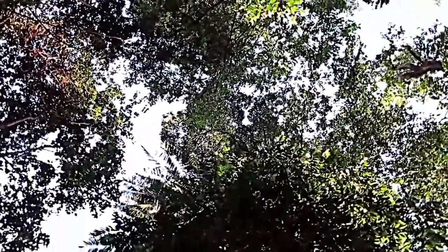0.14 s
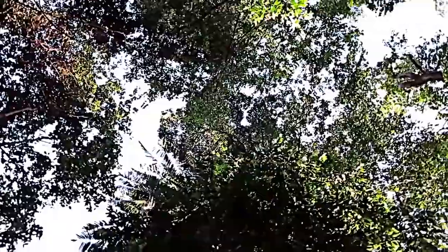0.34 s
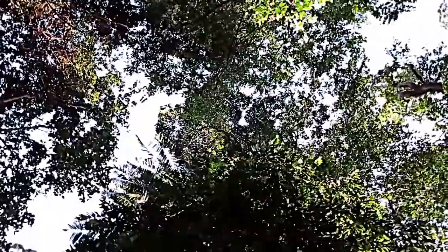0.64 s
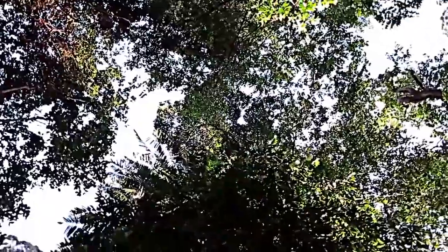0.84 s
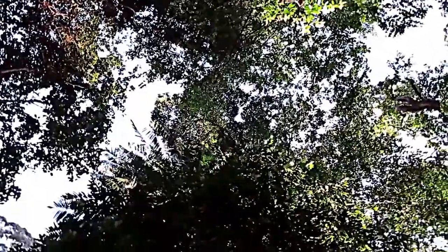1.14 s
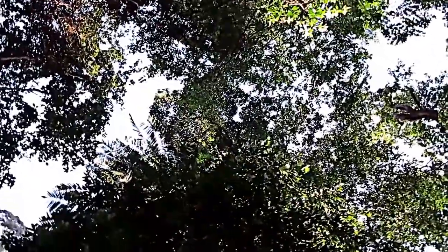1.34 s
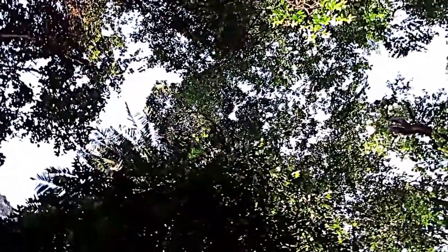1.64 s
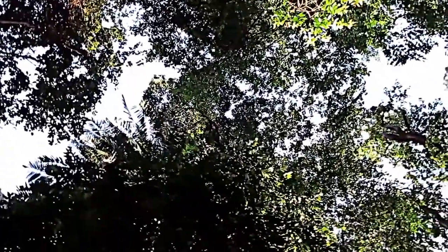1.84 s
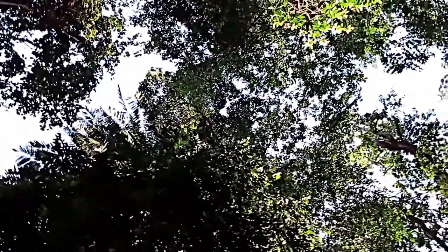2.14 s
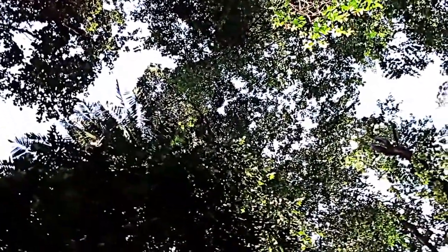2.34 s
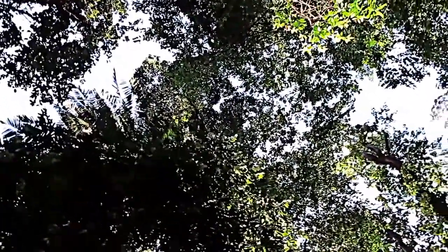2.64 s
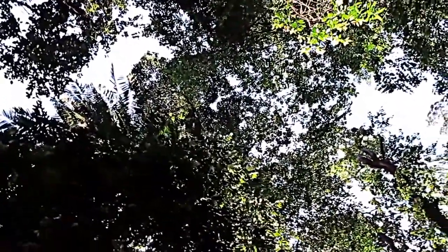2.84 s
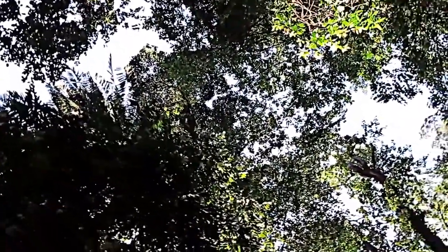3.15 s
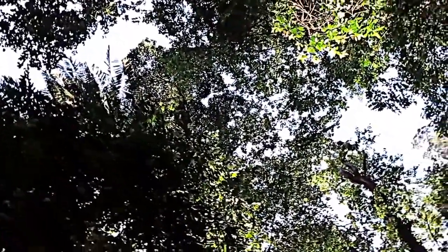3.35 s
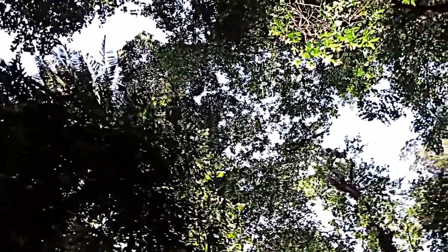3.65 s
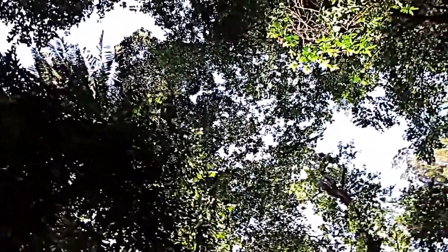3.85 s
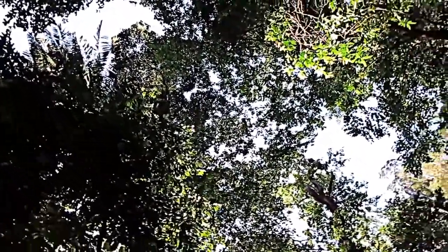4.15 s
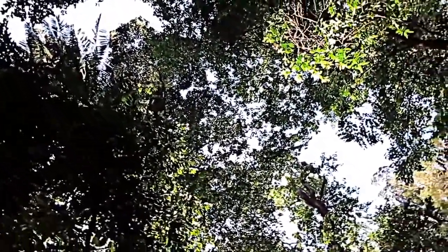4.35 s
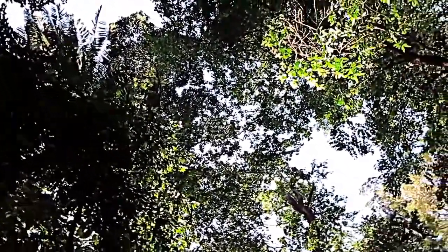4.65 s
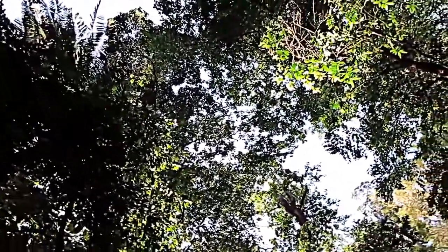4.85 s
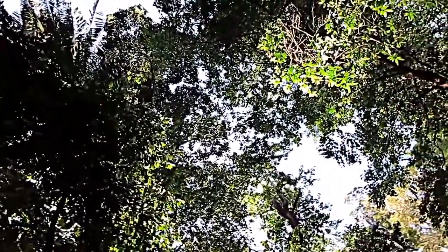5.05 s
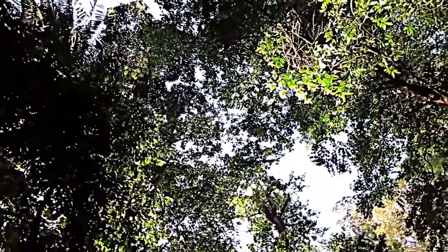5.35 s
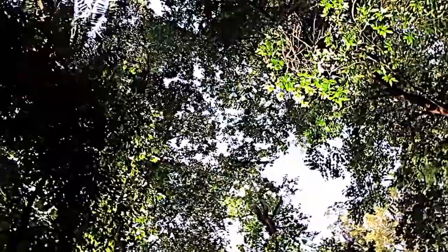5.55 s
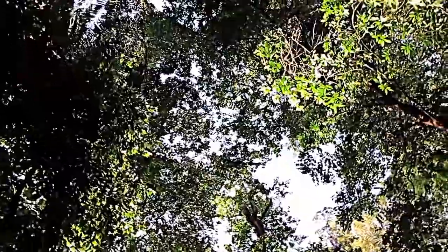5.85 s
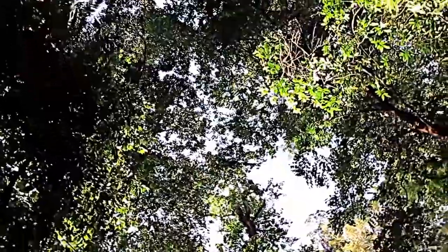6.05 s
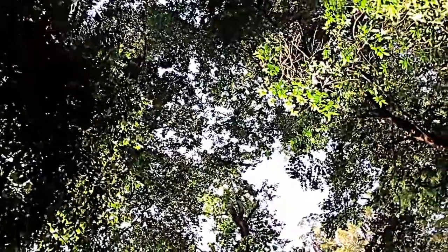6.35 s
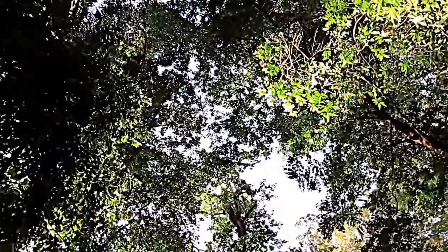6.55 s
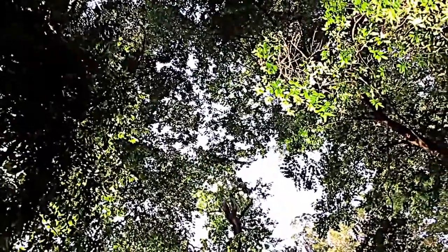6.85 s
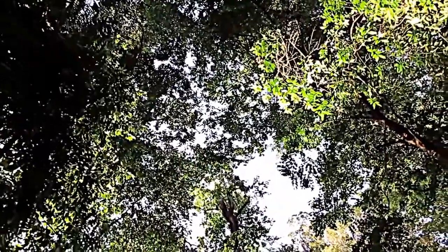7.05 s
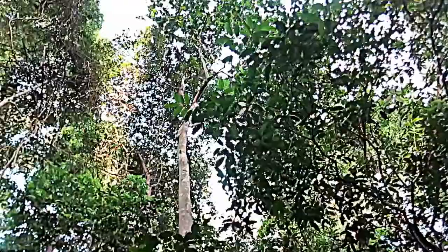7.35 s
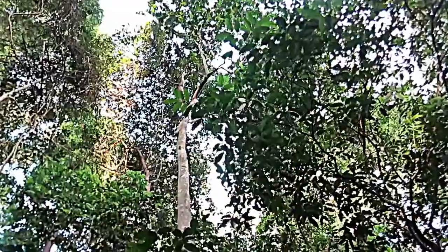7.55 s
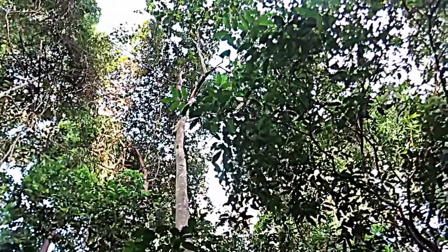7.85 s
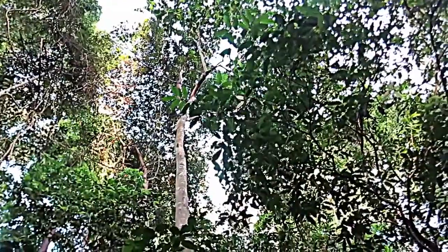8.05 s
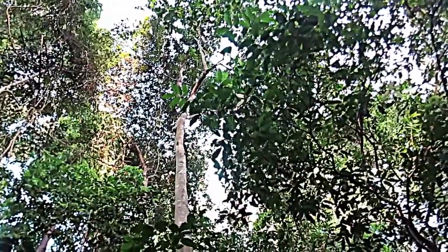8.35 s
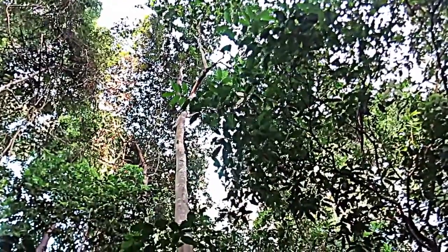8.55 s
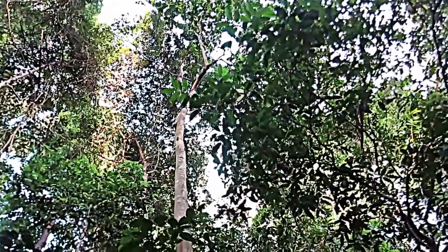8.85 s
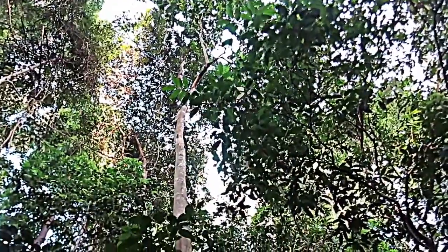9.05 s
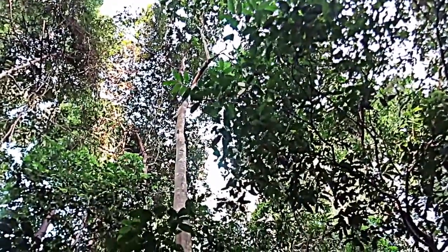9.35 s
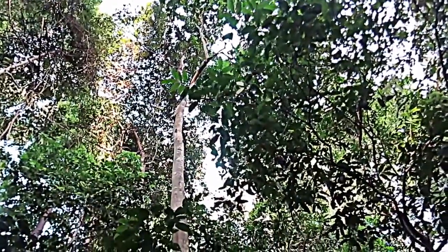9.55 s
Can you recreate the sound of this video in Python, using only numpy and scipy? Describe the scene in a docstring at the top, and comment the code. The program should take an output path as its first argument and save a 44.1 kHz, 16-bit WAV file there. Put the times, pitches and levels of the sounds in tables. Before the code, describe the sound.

A loud cicada rasps, throbs and squawks, then holds a shrill whine that slows to a rattle, over faint forest rumble.

```python
"""A cicada sings overhead, over forest rumble and a far chorus. Its voice is two clicking tymbals,
coloured by its body and thrown back by the trees. It opens with a dry rasp, a run of throbs (a twig-like
tick among them) and a squawk, then holds a long sinking whine that breaks into a rattle as a bird chirps.
At 7.3 s the sound cuts out briefly and resumes at another spot: rasp, throbs and squawk again while
a neighbour whines, then the start of a fresh whine."""
import sys
import numpy as np
from scipy import signal
from scipy.fft import rfft, irfft
from scipy.io import wavfile
from scipy.ndimage import uniform_filter1d, map_coordinates

SR = 44100
rng = np.random.default_rng(int(sys.argv[2]) if len(sys.argv) > 2 else 0)


def inscribe(sig):
    """Save sig as 16-bit PCM at rate SR to the path in sys.argv[1].

    A 1-D sig is mono; a 2-D sig holds one channel per row.
    Samples are clipped to [-1, 1] before scaling.
    """
    pcm = np.round(np.clip(np.atleast_2d(sig).T, -1, 1) * 32767)
    wavfile.write(sys.argv[1], SR, pcm.astype(np.int16))


N = 427769
TIME = np.arange(N) / SR
CUT_S, RESUME_S = 7.322, 7.416

# body EQ of a fresh whine: freq_hz, gain_db
FRESH_EQ = [(2400, -50.5), (3450, -20.5), (3950, -1.5), (4650, 0), (5150, -3.5), (5500, -28), (5850, -19),
            (8200, -15), (9400, -17.5), (10100, -42), (14000, -62)]
# body EQ of the sizzle on top of throbs and squawks: freq_hz, gain_db
SIZZLE_EQ = [(6000, -13), (8400, 18.5), (10000, 2.5), (11500, 4), (12600, 3), (14000, -19)]


def gain_of(db):
    return 10 ** (np.asarray(db) / 20)


def unit_rms(x):
    return x / np.sqrt(np.mean(x ** 2) + 1e-20)


def at_freq(curve, hz):
    freqs, values = np.transpose(curve)
    return np.interp(np.log(hz + 1), np.log(freqs + 1), values)


def at_time(curve, t):
    return np.interp(t, *np.transpose(curve))


def span(start_s, end_s):
    return np.arange(round(start_s * SR), round(end_s * SR)) / SR


def fade(t, seconds):
    return np.clip(np.minimum(t - t[0], t[-1] - t) / seconds, 0, 1)


def bump(t, middle_s, half_s):
    return np.exp(-((t - middle_s) / half_s) ** 2)


def add(mix, start_s, sound):
    part = mix[..., max(round(start_s * SR), 0):][..., :sound.shape[-1]]
    part += sound[..., :part.shape[-1]]


def band_rms(x, low_hz, high_hz):
    hz = np.fft.rfftfreq(len(x), 1 / SR)
    return np.sqrt(2 * np.sum(abs(rfft(x)[(hz > low_hz) & (hz < high_hz)]) ** 2)) / len(x)


def levelled(pair, size=4001):
    """Rides a stereo pair to unit level from moment to moment."""
    window = np.hanning(size)
    power = signal.fftconvolve(pair.mean(0) ** 2, window, "same")
    weight = signal.fftconvolve(np.ones(len(power)), window, "same")
    return pair / np.sqrt(power / weight + 1e-12)


def colour(x, eq, rings=(), size=8192):
    """A minimum-phase EQ with optional sharp peaks: every click rings on."""
    hz = np.fft.rfftfreq(size, 1 / SR)
    db = np.maximum(at_freq(eq, hz), -80)
    db = db + sum(height / (1 + (2 * (hz - centre) / width) ** 2) for centre, width, height in rings)
    log_gain = np.log(gain_of(np.r_[db, db[-2:0:-1]]))
    impulse = np.fft.ifft(np.exp(np.conj(signal.hilbert(log_gain)))).real[:size // 2]
    return signal.fftconvolve(x, impulse)[:len(x)]


def forest(x, t, wet_db, left_db, spacing=20):
    """Direct sound in stereo, plus scattered echoes from trunks and leaves."""
    # reverb time of the trees: freq_hz, t60_s
    decay = [(2000, 0.83), (5000, 1), (12000, 0.07)]
    # the microphone turns under the insect: time_s, left_lead_samples
    lead = [(0, 2.2), (3.1, 2), (3.9, 1.1), (6, 0)]
    slots = np.arange(2 * spacing, SR // 2, spacing)
    arrivals = slots + rng.integers(0, spacing, (2, len(slots)))
    taps = np.zeros((2, SR // 2 + spacing))
    np.put_along_axis(taps, arrivals, rng.choice([-1., 1.], arrivals.shape), 1)
    hz, age, spectra = signal.stft(taps, SR, nperseg=256)
    near_leaves = 1 + 3.8 * np.exp(-age / 0.0049)
    tail = signal.istft(spectra * near_leaves * gain_of(-60 * age / at_freq(decay, hz)[:, None]), SR)[1]
    echoes = signal.fftconvolve(x[None], tail / np.linalg.norm(tail[0]), axes=1)[:, :len(x)]
    left = map_coordinates(x, [np.arange(len(x)) + at_time(lead, t)], order=5)
    return (np.array([left, x]) + gain_of(wet_db) * echoes) * gain_of([[left_db / 2], [-left_db / 2]])


def wash(eq, patchy_db, size=1024):
    """A distant stereo bed of noise, drifting in patches."""
    # how alike left and right are: freq_hz, correlation
    likeness = [(60, 0.99), (250, 0.87), (600, 0.56), (1500, 0.85), (4000, 1), (12000, 0.13)]
    frames, hz = 4 * N // size + 5, np.fft.rfftfreq(size, 1 / SR)
    noise = rng.standard_normal((5, len(hz), frames))
    left, unrelated = noise[0] + 1j * noise[1], noise[2] + 1j * noise[3]
    patches = unit_rms(uniform_filter1d(uniform_filter1d(noise[4], size=12, axis=0), size=16, axis=1))
    alike = at_freq(likeness, hz)[:, None]
    spectra = np.array([left, alike * left + np.sqrt(1 - alike ** 2) * unrelated])
    spectra *= gain_of(at_freq(eq, hz)[:, None] + patchy_db * patches)
    return unit_rms(signal.istft(spectra, nperseg=size, noverlap=size - size // 4)[1][:, :N])


def fuzzy_tone(pitch_hz, width_hz):
    """Noise in one narrow band."""
    hz = np.fft.rfftfreq(N, 1 / SR)
    return unit_rms(irfft(rfft(rng.standard_normal(N)) / (1 + (2 * (hz - pitch_hz) / width_hz) ** 4), N))


def background():
    """Low rumble with a faint hum, far cicadas, and a lower call that comes and goes."""
    # spectra of the forest rumble and the far chorus: freq_hz, gain_db
    rumble_eq = [(20, -36), (59, -6), (90, -1), (141, -5.5), (224, -5.5), (913, -19), (1350, -27),
                 (2500, -30.5), (5000, -64)]
    chorus_eq = [(2400, -28.5), (3100, -10), (3800, 0), (4600, 6), (5500, -9), (7300, -2), (9000, -6.5),
                 (10500, -26), (12500, -22.5), (14000, -81)]
    # fader ride of the chorus: time_s, level_db
    chorus_ride = [(0, -34), (1.7, -31.5), (3.4, -35.5), (7.3, -28.5), (8.6, -34.5), (9.7, -40)]
    # swells of the lower call: middle_s, level_db
    call_swells = [(0.15, -58), (2.65, -56.5), (5.05, -58.5), (6.9, -66), (8.4, -60.5)]
    rumble = wash(rumble_eq, patchy_db=1.5, size=2048) * gain_of(np.where(TIME > RESUME_S, -40.5, -41.5))
    chorus = wash(chorus_eq, patchy_db=2.5) * gain_of(at_time(chorus_ride, TIME))
    swells = sum(gain_of(db) * bump(TIME, middle_s, half_s=0.75) for middle_s, db in call_swells)
    call = swells * fuzzy_tone(1594, width_hz=156)
    hum = gain_of(-52) * fuzzy_tone(113, width_hz=13.5)
    return rumble + chorus + call + hum


def bird(from_hz=1680):
    """Short, wavering whistles far off among the trees, each growing louder as it sweeps up."""
    # chirps, each peaking a little above its target: start_s, target_hz, level_db
    chirps = [(2.333, 2470, -57), (2.847, 2450, -58.5), (3.03, 2550, -56), (3.149, 2840, -49.5),
              (3.295, 2900, -51.5), (3.745, 3050, -50.5), (3.87, 2950, -56), (4.041, 2550, -56),
              (4.487, 2900, -55), (4.819, 2690, -53.5), (4.979, 2890, -52.5), (5.113, 2870, -49),
              (5.679, 2100, -58.5), (5.805, 2660, -52), (5.933, 2700, -55)]
    song = np.zeros(N)
    for start_s, target_hz, level_db in chirps:
        t = span(0, .055 * rng.uniform(.85, 1.15))
        sweep = 1.08 * np.sin(np.pi / 2 * (t / t[-1]) ** 1.3)
        waver = unit_rms(uniform_filter1d(rng.standard_normal(len(t)), size=60))
        hz = (from_hz + (target_hz - from_hz) * sweep) * (1 + 0.028 * waver)
        envelope = gain_of(level_db + 2.5) * (hz / target_hz) ** 1.7 * signal.windows.tukey(len(t), .5)
        add(song, start_s, envelope * np.sin(2 * np.pi * np.cumsum(hz) / SR))
    return forest(song, TIME, wet_db=9.5, left_db=-0.5)


def tick():
    """One small dry tick close by, like a twig."""
    track, t = np.zeros(N), span(0, 0.019)
    burst = rng.standard_normal(len(t)) * np.exp(-t / 0.00086)
    snap = colour(burst, eq=[(200, -32), (600, 3), (1800, -3), (2600, -4), (3500, -31)])
    add(track, 1.538, gain_of(-38.5) * unit_rms(snap))
    return track


def tymbals(t, hz, jitter_s, uneven_db, lag=.509, second_db=0, reach=8):
    """Two tymbals buckle in turn, once each a cycle; the second lags by a share of the cycle."""
    def during(curve, when):
        return np.interp(when, t - t[0], curve * np.ones(len(t)))
    cycles = np.cumsum(hz * np.ones(len(t))) / SR
    first_s = np.interp(np.arange(cycles[-1]), cycles, t - t[0])
    second_s = first_s[:-1] + during(lag, first_s[:-1]) * np.diff(first_s)
    due_s = np.r_[first_s, second_s]
    slip, force = rng.standard_normal((2, len(due_s)))
    position = (due_s + during(jitter_s, due_s) * slip) * SR
    strength = gain_of(uneven_db * force + np.r_[np.zeros(len(first_s)), during(second_db, second_s)])
    # a windowed sinc places each click between samples
    near = position.astype(int)[:, None] + np.arange(-reach, reach + 1)
    offset = near - position[:, None]
    click = np.sinc(offset) * np.cos(np.pi * offset / (2 * reach + 2)) ** 2
    return np.bincount(np.clip(near, 0, len(t) - 1).ravel(), (strength[:, None] * click).ravel(), len(t))


def crumple(clicks, grit_db, decay_s):
    """The ribs of a tymbal give way one by one: a short burst of grit follows each click."""
    burst = signal.lfilter([1], [1, -np.exp(-1 / (decay_s * SR))], abs(clicks))
    return unit_rms(clicks) + gain_of(grit_db) * unit_rms(burst * rng.standard_normal(len(clicks)))


def neighbour(start_s=7.4, end_s=8.75, rate_hz=159.2, sag_hz_per_s=4.2):
    """Another cicada whines a few trees away."""
    t = span(start_s, end_s)
    clicks = tymbals(t, rate_hz - sag_hz_per_s * (t - start_s), jitter_s=.00001, uneven_db=3.5)
    pair = forest(colour(clicks, FRESH_EQ), t, wet_db=1.5, left_db=0.5)
    return start_s, gain_of(-27.5) * levelled(pair) * fade(t, 0.04)


def rasp(start_s, end_s, level_db, swell_db_per_s, eq, fade_s=0.063):
    """Loose, irregular clicking: a broad dry buzz."""
    t = span(start_s, end_s)
    clicks = crumple(tymbals(t, hz=165, jitter_s=.0003, uneven_db=1), grit_db=-2, decay_s=0.0012)
    pair = forest(colour(clicks, eq), t, wet_db=-1, left_db=0.5)
    edge_s = np.minimum(end_s - t, t - start_s if start_s else 1)  # no fade-in at time zero
    envelope = gain_of(level_db + swell_db_per_s * (t - start_s)) * np.clip(edge_s / fade_s, 0, 1)
    return start_s, envelope * pair / band_rms(pair[1], 6100, 7630)


def throbs(throbs_per_s=15.5, arch_db=5, crest=0.37, brighten_s=0.31):
    """Even bursts of half a dozen clicks; each run swells, fades and brightens toward the squawk."""
    # runs of throbs: first_s, last_s, peak_db, sizzle_db, sizzle_rise_db
    runs = [(1.205, 1.789, -25, -45.5, 13), (8.054, 8.567, -26.5, -58.5, 15.5)]
    # body EQ of a throb: freq_hz, gain_db
    throb_eq = [(2800, -35.5), (3900, 2.5), (4800, 9), (5600, -16), (7500, -6.5), (9200, -9), (10300, -31),
                (14000, -50)]
    pulses, sizzle = np.zeros((2, N))
    for first_s, last_s, peak_db, sizzle_db, rise_db in runs:
        for along in np.linspace(0, 1, round((last_s - first_s) * throbs_per_s) + 1):
            start_s = first_s + along * (last_s - first_s)
            t = span(start_s, start_s + .05)
            gate = 1 / (1 + np.exp((t - start_s - .021) / 0.0027))
            clicks = tymbals(t, hz=158, jitter_s=0.000149, uneven_db=2)
            clicks = crumple(clicks, grit_db=-4, decay_s=0.0015) * gate
            level_db = peak_db - arch_db * (2 * (along - crest)) ** 2
            bright_db = sizzle_db + rise_db * max(1 - (last_s - start_s) / brighten_s, 0)
            add(pulses, start_s, gain_of(level_db) * unit_rms(colour(clicks, throb_eq)))
            add(sizzle, start_s, gain_of(bright_db) * unit_rms(colour(clicks, SIZZLE_EQ)))
    return forest(pulses, TIME, wet_db=-3.5, left_db=1) + forest(sizzle, TIME, wet_db=4.5, left_db=-4)


def squawk(start_s, rise_s, peak_db, sizzle_db, length_s=0.38, relax_s=.09, release_s=0.16):
    """A bright cry: rate and colour sink together as the body relaxes, and the sizzle dies away."""
    # EQ of the relaxed body: freq_hz, gain_db
    squawk_eq = [(1900, -38.5), (2620, -11), (4050, -7), (6000, -4.5), (6600, 1), (7300, 1), (8700, -18),
                 (10400, -28.5), (13000, -61)]
    cry_db_per_s, sizzle_db_per_s = -15, -81
    t = span(start_s, start_s + length_s)
    age = t - t[0]
    tension = .2 * np.exp(-age / relax_s)
    clicks = tymbals(t, 165 / (1 + tension / 2), jitter_s=.00001, uneven_db=1.5)
    clicks = crumple(clicks, grit_db=-12, decay_s=0.0013)
    sinking = map_coordinates(colour(clicks, squawk_eq), [np.cumsum(1 + tension)], order=5)  # varispeed
    cry = levelled(forest(sinking, t, wet_db=-1.5, left_db=0.5)) * np.minimum(age / rise_s, 1) ** 2
    cry *= gain_of(peak_db + cry_db_per_s * np.maximum(age - rise_s, 0))
    sizzle = levelled(forest(colour(clicks, SIZZLE_EQ), t, wet_db=0, left_db=4))
    sizzle *= fade(t, 0.01) * gain_of(sizzle_db + sizzle_db_per_s * age)
    return start_s, (cry + sizzle) * np.clip((t[-1] - t) / release_s, 0, 1)


def trunk_echoes(x, echo_db=-8, longest_s=.014, drift=.0009, count=6):
    """Near echoes whose paths drift: mixed with the voice, they make partials swell and fade in turn."""
    n = np.arange(len(x))
    paths = [n - rng.random() * longest_s * SR - rng.uniform(-drift, drift) * n for _ in range(count)]
    return gain_of(echo_db) * sum(map_coordinates(x, [path]) for path in paths) / np.sqrt(count)


def whine(start_s, end_s, level_db, held_back_db, attack_s, rings):
    """Even clicks fuse into sinking partials; tiring, they slow into a rattle of gritty double clicks."""
    # body EQ of the worn whine and of the rattle: freq_hz, gain_db
    worn_eq = [(2400, -46), (3200, -29.5), (3650, -3.5), (4500, 2), (4850, 0.5), (5350, -19), (6400, -15.5),
               (7600, -6.5), (8200, -18), (9000, -16.5), (10400, -42), (14000, -48)]
    rattle_eq = [(2600, -52), (3230, -22), (3700, -2), (4850, -0.5), (5420, -18), (7420, -8), (8110, -17.5),
                 (9300, -16), (10200, -58), (12000, -29), (13800, -87)]
    # ringing pitches of the surrounding forest that colour the rattle: centre_hz, width_hz, gain_db
    forest_rings = [(3660, 110, 3), (3960, 180, 1), (4180, 130, -3), (4600, 450, 4.5), (7630, 200, 5)]
    # the second tymbal lags further, bringing out the odd partials: middle_s, half_length_s
    slips = [(3.02, .2), (3.93, .18), (4.72, .1), (9.55, .24)]
    # brief lifts where the whine rings out: middle_s, boost_db
    swells = [(3.92, 3.5), (9.05, 3.5)]
    rate_hz, sag_hz_per_s, bend_hz, bend_s, tired_hz = 159.68, 3.95, 1.2, .15, 60
    clean_s, breakup_s, tiring_s, loosening_s, double_click_s = 2.72, 0.07, .24, 0.31, .0031
    t = span(start_s, end_s)
    age = t - start_s
    clean_age, overdue = np.minimum(age, clean_s), np.maximum(age - clean_s, 0)
    wear = (clean_age / clean_s) ** 2
    broken = .5 + .5 * np.tanh((age - clean_s) / (2 * breakup_s))  # crossfade from whine to rattle
    loose = overdue ** 2 / (overdue ** 2 + loosening_s ** 2)

    bend = np.exp(-clean_age / bend_s) - np.exp((clean_age - clean_s) / bend_s)  # starts sharp, ends flat
    clean_hz = rate_hz - sag_hz_per_s * clean_age + bend_hz * bend
    hz = tired_hz + (clean_hz - tired_hz) / (1 + (overdue / tiring_s) ** 1.1)
    lag = .5045 + .008 * sum(bump(t, *slip) for slip in slips)
    lag += (hz * double_click_s - lag) * np.minimum(overdue / loosening_s, 1)
    clicks = tymbals(t, hz, jitter_s=0.000184 * loose, uneven_db=.2, lag=lag,
                     second_db=-4.5 * (0.5 - broken))
    clicks = crumple(clicks, grit_db=-32 * (1 - broken) - 8 * broken, decay_s=.0018)

    voice = (colour(clicks * (1 - broken) * (1 - wear), FRESH_EQ, rings)
             + colour(clicks * (1 - broken) * wear, worn_eq, rings)
             + colour(clicks * broken, rattle_eq, forest_rings))
    voice += (1 - broken) * trunk_echoes(voice)
    pair = levelled(forest(voice, t, wet_db=-2.5, left_db=0.7), size=12001)

    opening_db = -held_back_db * np.exp(-age / 0.19)
    slowing_db = 3.5 * np.log2(hz / rate_hz)  # slower clicking is quieter
    swell_db = sum(boost_db * bump(t, middle_s, half_s=0.059) for middle_s, boost_db in swells)
    envelope = np.minimum(age / attack_s, 1) * gain_of(level_db + opening_db + slowing_db + swell_db)
    return start_s, pair * envelope


def scene():
    """The cicada's two phrases over the forest bed."""
    # rasps: start_s, end_s, treble_level_db, swell_db_per_s
    rasps = [(0, 0.491, -30, -1), (0.409, 1.268, -29, 5.5), (7.351, 8.08, -25, -5)]
    # one body EQ per rasp: freq_hz, gain_db
    rasp_eqs = [
        [(1000, -58), (2300, -18), (4200, 3.5), (5400, -7.5), (7100, 0), (8240, -2.5), (13800, -54)],
        [(1000, -50), (2050, -18), (3600, -6), (4200, -1), (5400, -9.5), (7000, 1), (8240, -4), (11100, -33),
         (13800, -56)],
        [(1000, -35), (1700, -23), (3010, -8), (3400, -9.5), (4200, -2.5), (5700, -6.5), (6500, 0.5),
         (8240, -4.5), (12100, -43), (13800, -54)],
    ]
    # squawks: start_s, rise_s, peak_db, sizzle_db
    squawks = [(1.795, 0.029, -25, -39), (8.609, 0.069, -21, -35.5)]
    # whines: start_s, end_s, level_db, held_back_db, attack_s
    whines = [(2.04, 7.33, -18.5, 5, 0.048), (8.87, 9.71, -20.5, -1.5, 0.074)]
    # ringing pitches of each forest spot, which the partials sink through: centre_hz, width_hz, gain_db
    spot_rings = [
        [(3880, 35, 6), (3995, 40, 7), (4208, 40, 4), (4520, 70, 5.5), (4722, 50, 9), (5065, 55, 8)],
        [(4560, 50, 3), (4780, 80, 8)],
    ]
    mix = background() + throbs() + bird() + tick()
    for cue, eq in zip(rasps, rasp_eqs):
        add(mix, *rasp(*cue, eq))
    for cue in squawks:
        add(mix, *squawk(*cue))
    for cue, rings in zip(whines, spot_rings):
        add(mix, *whine(*cue, rings))
    add(mix, *neighbour())
    return mix


def record(dry, threshold_db=-25.5, squeeze=0.35, react_s=0.16, lowpass_hz=13700):
    """Left and right differ in colour, a compressor ducks loud passages, then a brief mute and a high cut."""
    # stereo balance: freq_hz, left_minus_right_db
    balance = [(100, 1), (1200, 0.5), (2800, -0.5), (4500, -3), (7000, -13.5), (9000, -3), (10500, 20.5),
               (12500, 12.5)]
    # phase between the channels: freq_hz, left_lead_rad
    phase = [(5400, 0), (7000, 1.5), (8800, 3), (12000, 3.5)]
    hz = np.fft.rfftfreq(N, 1 / SR)
    left_db, lead_rad = at_freq(balance, hz), at_freq(phase, hz)
    response = np.array([gain_of(left_db / 2) * np.exp(1j * lead_rad), gain_of(-left_db / 2)])
    heard = irfft(rfft(dry) * response, N)
    power_db = 10 * np.log10(abs(uniform_filter1d((heard ** 2).mean(0), int(react_s * SR))) + 1e-12)
    heard *= gain_of(-squeeze * np.maximum(power_db - threshold_db, 0))
    gate = np.clip(np.maximum(CUT_S - TIME, TIME - RESUME_S) / 0.0092, 0, 1)
    lowpass = signal.firwin(255, lowpass_hz, window=("kaiser", 8), fs=SR)
    return signal.oaconvolve(heard * gate, lowpass[None], "same")


dry = scene()
out = record(dry)
inscribe(out)
```